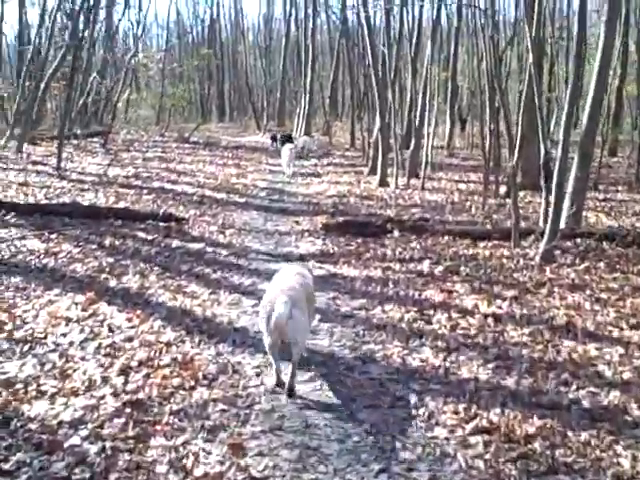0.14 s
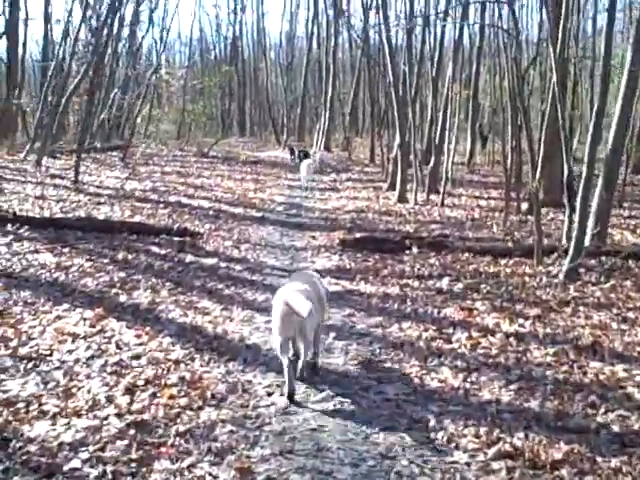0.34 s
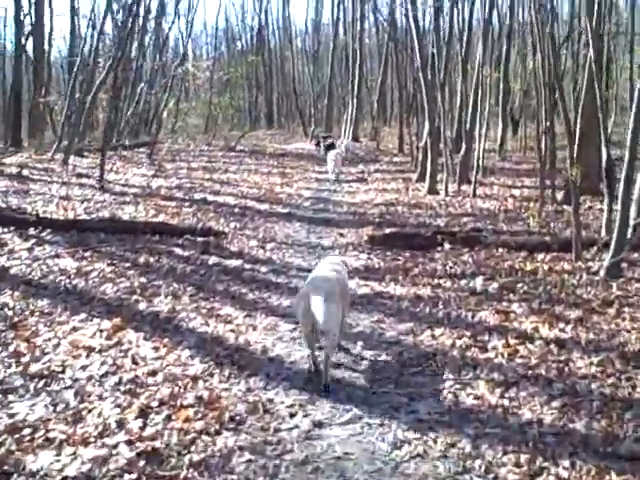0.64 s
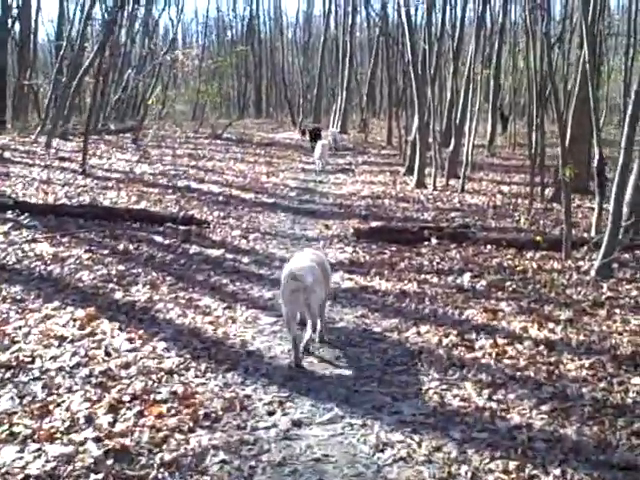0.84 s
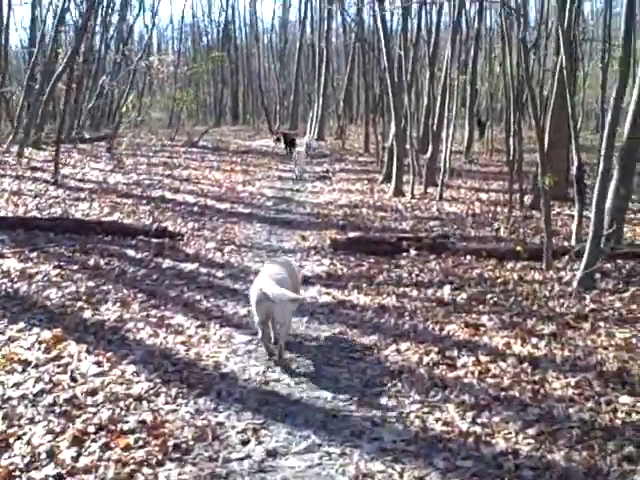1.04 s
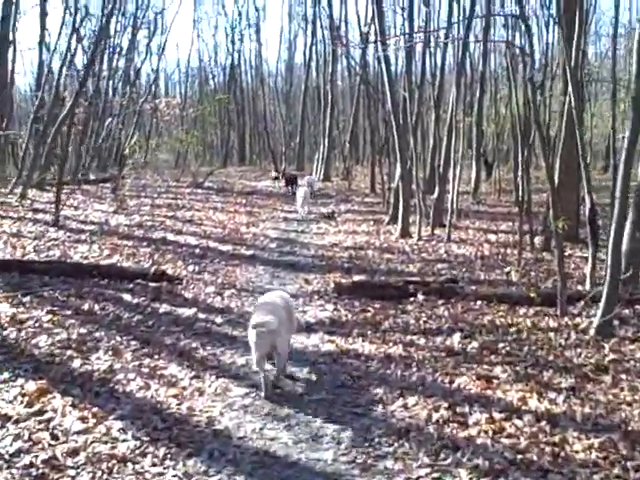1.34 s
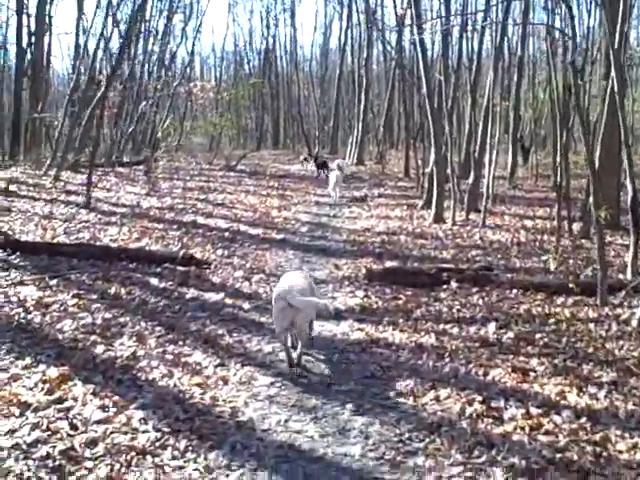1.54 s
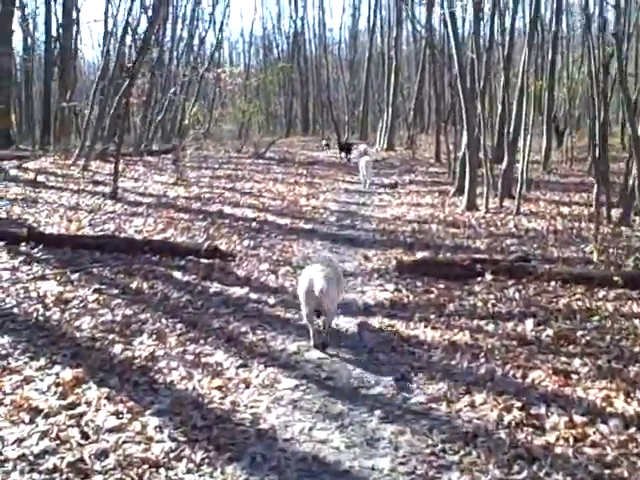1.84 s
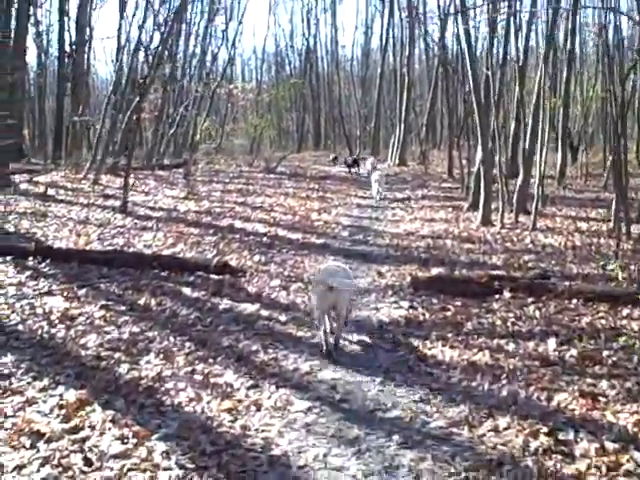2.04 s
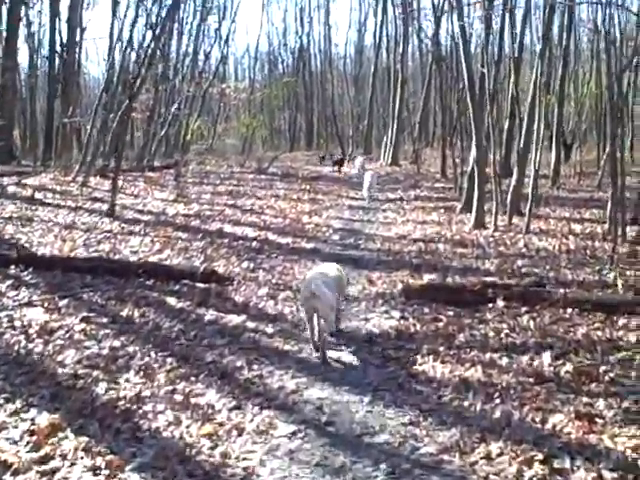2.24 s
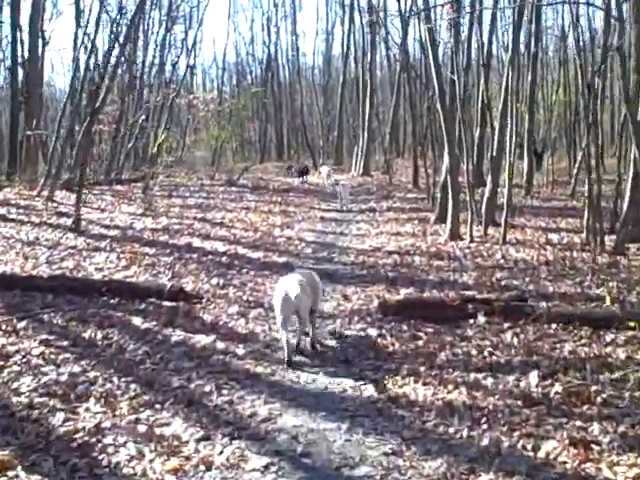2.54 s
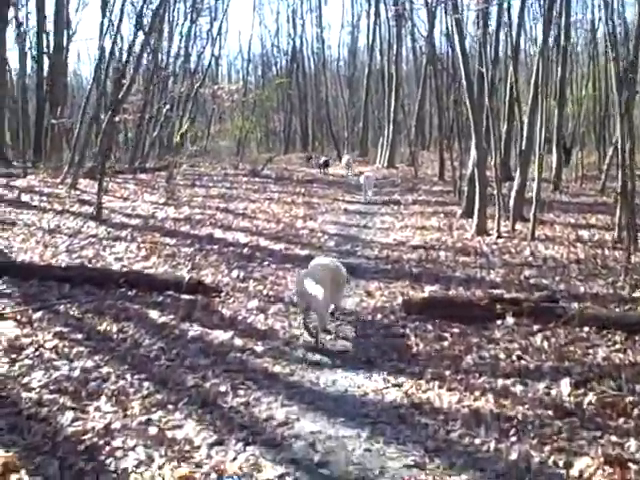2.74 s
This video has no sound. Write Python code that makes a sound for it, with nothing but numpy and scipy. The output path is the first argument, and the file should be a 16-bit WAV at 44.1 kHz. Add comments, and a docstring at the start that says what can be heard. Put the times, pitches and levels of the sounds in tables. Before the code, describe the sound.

Footsteps crunch and rustle through dry leaves from start to end, in uneven overlapping scuffs. Bright snaps cluster around 0.3 to 0.7 seconds, and a strong crunch with a low soil thud lands near 1.6. The rustling softens from about 1.7, with another snap and dull thud near 2.45, then quieter crackling. Faint outdoor rumble and thin hiss lie underneath; close, dry mono sound.

```python
"""Steps through dry leaves

Feet and paws move through dry fallen leaves on a woodland trail. Each press or scuff crumples leaves:
thousands of tiny random cracks ring for a few cycles, mixed with pitchless ticks and some louder snaps.
A few steps thud on the soil as low, dying tones with a rough rumble and grit.
A low outdoor rumble and faint hiss, made of noise in bands, lie underneath."""
import sys
import numpy as np
from scipy import signal
from scipy.io import wavfile

SR = 44100
rng = np.random.default_rng(int(sys.argv[2]) if len(sys.argv) > 2 else 0)


def master_out(mix):
    """Clip the mix to full scale and print it as 16-bit PCM to the path in sys.argv[1]."""
    frames = np.transpose(np.atleast_2d(mix))
    ceiling = np.clip(frames, -1, 1)
    pcm = np.round(ceiling * 32767).astype(np.int16)
    wavfile.write(sys.argv[1], SR, pcm)


N = 127890   # length in samples


def amp(db):
    """Turn dB into a plain multiplier."""
    return 10 ** (np.asarray(db) / 20)


def rms_one(x):
    """Scale a signal to an average strength (RMS) of 1."""
    return x / np.sqrt(np.mean(x ** 2) + 1e-20)


def at_hz(points, hz):
    """Read a curve of (Hz, value) points, with straight lines on a log pitch scale."""
    points = np.array(points)
    return np.interp(np.log(hz), np.log(points[:, 0]), points[:, 1])


def drift(rate_hz):
    """Slow random wandering with spread 1: noise smoothed twice."""
    r = np.exp(-2 * np.pi * rate_hz / SR)
    wander = signal.lfilter([1], [1, -2 * r, r * r], rng.standard_normal(N + SR))
    return rms_one(wander[SR:])   # the first second lets the filter settle


def ring(clicks, hz, t60):
    """Each unit click starts a sine of height about 1 that dies by 60 dB in t60 seconds."""
    r = amp(-60 / (t60 * SR))
    w = 2 * np.pi * hz / SR
    return signal.lfilter([0, np.sin(w)], [1, -2 * r * np.cos(w), r * r], clicks + 1e-18)


def cracks(per_s, spread_db, clump):
    """Random clicks of uneven size and either sign, coming in clumps."""
    sizes = amp(spread_db * np.minimum(rng.exponential(1, N), 5)) * rng.choice([-1, 1], N)
    return sizes * (rng.random(N) < per_s * clump / SR)


def band(x, low_hz, high_hz):
    """Keep only the sound between two pitches."""
    return signal.sosfilt(signal.butter(2, [low_hz, high_hz], "band", fs=SR, output="sos"), x)


# Presses and scuffs in the leaves.
# Each row: peak in seconds, level in dB before LEAVES_DB, rise in ms and fall in ms (both over 10 dB),
# extra dB near 2 kHz, extra dB near 4 kHz.
CRUNCHES = [(0.005, -45, 208, 30, 0, 4), (0.055, -42, 35, 57, 5.5, -5.5), (0.117, -34.5, 12, 39, 5, -3),
            (0.149, -37.5, 67, 29, -3, 1.5), (0.166, -38, 5.4, 120, 0.5, -2.5),
            (0.262, -38, 15, 39, -3, -4), (0.311, -31, 24, 44, 2.5, 2), (0.426, -31, 15, 9.5, 2, 0.5),
            (0.457, -37.5, 180, 13, -0.5, -2.5), (0.553, -34, 83, 29, 5, 0), (0.585, -50, 2.6, 22, 1, -3),
            (0.621, -33.5, 3, 87, 6.5, 0), (0.706, -35, 200, 22, 0, 0), (0.747, -36, 180, 81, -1.5, 0),
            (0.838, -36, 14, 300, 1.5, -3), (0.907, -32, 47, 26, 1.5, -2), (0.954, -34.5, 14, 73, -6, -4.5),
            (1.039, -40.5, 130, 2.8, -4, -4), (1.073, -41, 2, 12, -12, 3),
            (1.103, -31, 28.4, 23, -2.5, -1.5), (1.12, -37.5, 6, 63, 1.5, 0),
            (1.189, -35.5, 9.5, 9.3, -12, -3), (1.226, -36.5, 30, 28, 2.5, -5), (1.264, -34, 14, 3, -5, 1),
            (1.309, -33.5, 61, 7.1, 2.5, 0.5), (1.354, -39.5, 120, 160, 2.5, -1.5),
            (1.432, -38, 2, 6.9, 13.5, 6), (1.482, -33.5, 22, 13, 1.5, 1.5),
            (1.532, -36.5, 49, 41, -3, 0.5), (1.587, -34.5, 7.5, 24, -7, 2),
            (1.642, -31, 8, 26.5, 6.5, -1.5), (1.705, -41, 460, 60, 4.5, -1.5),
            (1.784, -38, 25, 9.5, -9, 3.5), (1.83, -35, 46, 42, -3.5, 2), (1.881, -46, 2, 14, 10, -1),
            (1.92, -43.5, 21, 3.9, 0, 6), (1.941, -42, 19, 16, -4, -5), (2.003, -43.5, 30, 7.6, 22, -4),
            (2.028, -40.5, 53, 32, -7.5, 6), (2.09, -42, 100, 8.6, 0.5, 1), (2.114, -45, 13, 13, 0, 6.5),
            (2.187, -43.5, 63, 16, -3, 1.5), (2.21, -37.5, 8.9, 45, 0.5, 1), (2.295, -39, 44, 24, 1, 2),
            (2.381, -42, 93, 53, -1, -2), (2.44, -31, 1.7, 2.7, -18, -17), (2.451, -35.5, 22, 16, -5, -1),
            (2.475, -37.5, 7.6, 24, -1, 1), (2.531, -42, 64, 48, 0.5, -2.5), (2.614, -38.5, 27, 48, 3, 3.5),
            (2.641, -44, 2, 21, -14, -6), (2.682, -41, 94, 11, 1, 2), (2.713, -43, 30, 3.3, -7, -7),
            (2.752, -43, 80, 51, -6, -1.5), (2.792, -41.5, 4.6, 29, 1, -3),
            (2.888, -44.5, 60, 21, 5.5, -1.5)]
CRUMBLE = 1.9   # shape of the fall: 2 a bell, 1 an even decay


def pressure():
    """Each crunch swells as a bell and crumbles away; returns total strength and the moment's two colours."""
    ms = np.arange(N) / SR * 1000
    power, colour = 1e-9, 0
    for s, db, rise_ms, fall_ms, *colour_db in CRUNCHES:
        from_peak = ms - 1000 * s
        rise = (from_peak / rise_ms) ** 2
        fall = np.abs(from_peak / fall_ms) ** CRUMBLE
        # twice the dB gives power
        bell = amp(2 * db - 20 * np.where(from_peak < 0, rise, fall))
        power = power + bell
        colour = colour + bell * np.array(colour_db)[:, None]
    return np.sqrt(power), colour / power   # stronger crunches count for more in the colour


# Colour of crumpling leaf before each crunch tilts it.
# Each row: pitch in Hz, relative level in dB per Hz.
LEAF = [(240, -47), (400, -41), (935, -25), (1040, -14), (2050, -8.5), (2360, -6.5), (3990, -4),
        (7630, -3.5), (12900, 2), (14800, -2.5), (16000, -1)]
CRACKS_PER_S, CRACK_SPREAD_DB = 11000, 2.5   # rate before clumping
CRACK_CYCLES = 16.2   # cycles for a ring to die by 60 dB
TICKS_PER_S, TICK_SPREAD_DB, TICK_DB = 2500, 3.5, 6   # cracks too short to have a pitch
CLUMP_DB = 1.62   # unevenness of the crack rate
SCRAP_PATCHY_DB = 1   # sizes of scrap swell and rest, three neighbouring sizes together
BODY_HZ, MID_HZ, TOP_HZ = 1800, 4300, 10000   # corners of the two colour tilts
LEAVES_DB = 0.33


def leaves():
    """Cracks are dealt to leaf scraps of many sizes; ticks sound across the whole range at once."""
    strength, (body_db, mid_db) = pressure()
    clump = amp(CLUMP_DB * drift(70))
    pitched = cracks(CRACKS_PER_S, CRACK_SPREAD_DB, clump)
    ticks = cracks(TICKS_PER_S, TICK_SPREAD_DB, clump)
    patch = [SCRAP_PATCHY_DB * drift(33) for _ in range(19)]
    edges = np.geomspace(350, 17000, num=57)
    # higher bands, from smaller scraps, get more of the cracks
    share = np.diff(np.sqrt(edges)) / np.ptp(np.sqrt(edges))
    dealt = rng.choice(56, N, p=share)
    out = 0
    for k, (low, high) in enumerate(zip(edges, edges[1:])):
        hz = np.sqrt(low * high)
        ringing = rms_one(ring(pitched * (dealt == k), hz, CRACK_CYCLES / hz))
        scrap = ringing + amp(TICK_DB) * rms_one(band(ticks, low, high))
        body_share = at_hz([(BODY_HZ / 4, 0), (BODY_HZ, 1), (MID_HZ, 0)], hz)
        mid_share = at_hz([(BODY_HZ, 0), (MID_HZ, 1), (TOP_HZ, 0)], hz)
        lean_db = body_share * body_db + mid_share * mid_db
        level = amp(at_hz(LEAF, hz) + lean_db + patch[k // 3])
        out = out + np.sqrt(hz) * level * scrap   # wider bands hold more sound
    return amp(LEAVES_DB) * strength * rms_one(out)


# Colour of the outdoor background before the treble cut, wavering and fade.
# Each row: pitch in Hz, relative level in dB per Hz.
AIR = [(12, -30), (20, 7.5), (61, 6.5), (204, -6.5), (718, -11.5), (1810, -12), (3160, 2), (7950, -4.5),
       (13200, 1.5), (14700, -2), (16000, -14)]
AIR_DB, AIR_PATCHY_DB = -51.5, -3.5   # overall level, size of the wavering
AIR_TREBLE_DB = -12   # applied above 1500 Hz
AIR_FADE_DB_PER_S = 1.5   # above the rumble, far rustling dies down as it moves away


def air():
    """Half-octave bands of noise, each wavering a little; rumble strongest."""
    white = rng.standard_normal((2, N + SR))
    edges = 16 * 2 ** np.arange(0, 10.1, .5)
    from_middle_s = (np.arange(N) - N / 2) / SR
    out = 0
    for k, (low, high) in enumerate(zip(edges, edges[1:])):
        hz = np.sqrt(low * high)
        db = at_hz(AIR, hz) + AIR_TREBLE_DB * (hz > 1500) + AIR_PATCHY_DB * drift(3.1)
        db = db - AIR_FADE_DB_PER_S * (hz > 350) * from_middle_s
        out = out + amp(db) * band(white[k % 2], low, high)[SR:]   # neighbours use different noise
    return amp(AIR_DB) * rms_one(out)


# Single loud snaps of leaf or twig.
# Each row: start in seconds, peak level in dB, pitch in Hz.
SNAPS = [(0.1135, -33, 3300), (0.3092, -21, 10500), (0.3325, -24, 11200), (0.3408, -28, 6500),
         (0.4125, -25, 10500), (0.5174, -25, 10400), (0.5255, -25, 11200), (0.5449, -23, 11600),
         (0.5553, -25, 7000), (0.5692, -30, 2900), (0.6218, -29, 3800), (0.6313, -22, 11400),
         (0.6605, -27, 6200), (0.6705, -28, 4000), (0.7025, -28, 4200), (0.9271, -27, 12100),
         (1.1368, -27, 9200), (1.2897, -25, 9600), (1.302, -23, 13300), (1.3284, -28, 12100),
         (1.4616, -28, 10200), (1.5262, -25, 13600), (1.5905, -27, 3900), (1.6175, -27, 12000),
         (1.6401, -23, 13000), (1.6495, -20, 12400), (1.9117, -34, 4800), (2.0122, -30, 4600),
         (2.0272, -27, 13500), (2.3924, -33, 5500), (2.4403, -24, 11800), (2.4534, -26, 10500),
         (2.4795, -29, 11000), (2.6422, -23, 12000), (2.7505, -37, 3800), (2.791, -39, 4500)]
SNAP_T60_S, SPLINTER_T60_S = .0016, .006   # seconds for ring and splinters to die by 60 dB
SNAP_SPAN = 1.6   # ratio heard either side of the pitch


def snaps():
    """A break and its dying splinters set off a short ring at the pitch of the piece that breaks."""
    out = np.zeros(N)
    t = np.arange(400) / SR
    chances = rng.standard_normal((len(SNAPS), len(t)))
    for (s, db, hz), chance in zip(SNAPS, chances):
        splinters = (t == 0) + amp(-12 - 60 * t / SPLINTER_T60_S) * chance   # one click, then noise
        snap = ring(splinters, hz, SNAP_T60_S) + splinters
        snap = band(snap, hz / SNAP_SPAN, min(SNAP_SPAN * hz, 15500))
        i = int(s * SR)
        out[i:i + len(snap)] += amp(db) * snap / np.abs(snap).max()
    return out


# Steps that thud on the soil.
# Each row: start in seconds, level of the push in dB, pitch in Hz,
# seconds for the rumble to die by 60 dB (it is cut off after half a second).
THUDS = [(0.302, -49.5, 138, 0.093), (1.447, -53, 112, 0.22), (1.476, -49.5, 234, 0.086),
         (1.642, -42, 171, 0.69), (1.992, -55, 243, 0.29), (2.497, -49, 151, 0.28)]
THUD_T60_S, THUD_SOFT_PER_S = 0.059, 300   # dying time of the push, speed of its soft start
RUMBLE_DB, RUMBLE_RING_S = -10, 0.14   # rumble against the push; longer ringing is less rough
GRIT_DB = -1.5   # soil and twigs shifting under the step, against the rumble


def thuds():
    """A soft push into the soil rings low and briefly; a rough rumble at that pitch and some grit trail."""
    out = np.zeros(N + SR)
    t = np.arange(SR // 2) / SR
    white = rng.standard_normal(N + SR)
    grit = rms_one(band(white, 200, 750))
    soft = 1 - np.exp(-THUD_SOFT_PER_S * t)
    push = soft * amp(-60 * t / THUD_T60_S)
    for s, db, hz, tail_s in THUDS:
        i = int(s * SR)
        tone = np.sin(2 * np.pi * hz * t)
        rough = rms_one(ring(white, hz, RUMBLE_RING_S)) + amp(GRIT_DB) * grit
        tail = soft * amp(RUMBLE_DB - 60 * t / tail_s) * rough[i:i + len(t)]
        # the hollow soil hums on faintly, dying half as fast as the rumble
        hum = soft * amp(-16 - 60 * t / tail_s / 2) * tone
        out[i:i + len(t)] += amp(db) * (push / push.max() * tone + tail + hum)
    return out[:N]


def scene():
    """Add the four layers into one channel."""
    return (leaves() + snaps() + thuds() + air())[None]


def record(dry):
    """The top is cut steeply above 15760 Hz."""
    return signal.sosfilt(signal.ellip(16, .5, 75, 15760, fs=SR, output="sos"), dry)


dry = scene()
out = record(dry)
master_out(out)
```